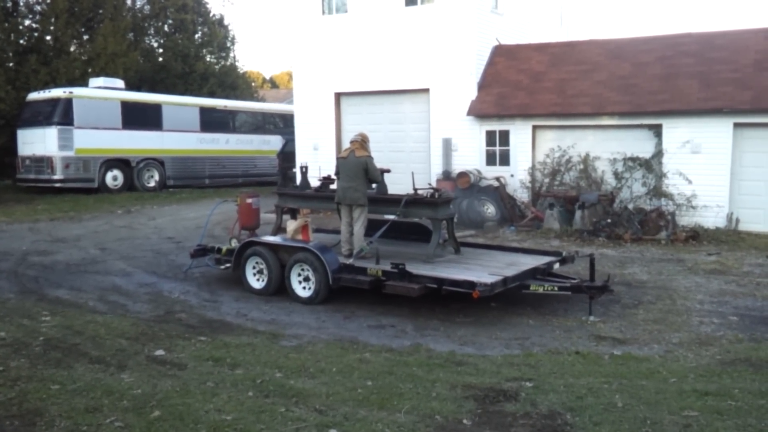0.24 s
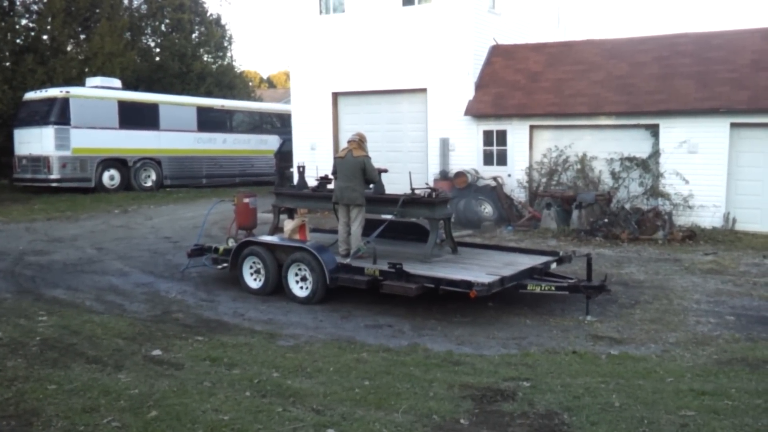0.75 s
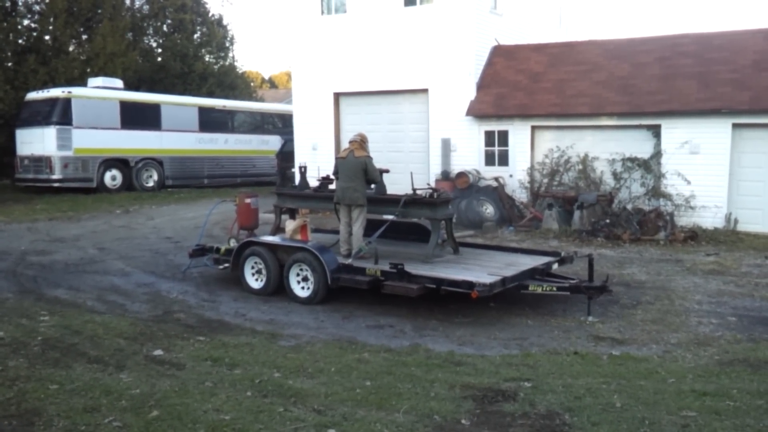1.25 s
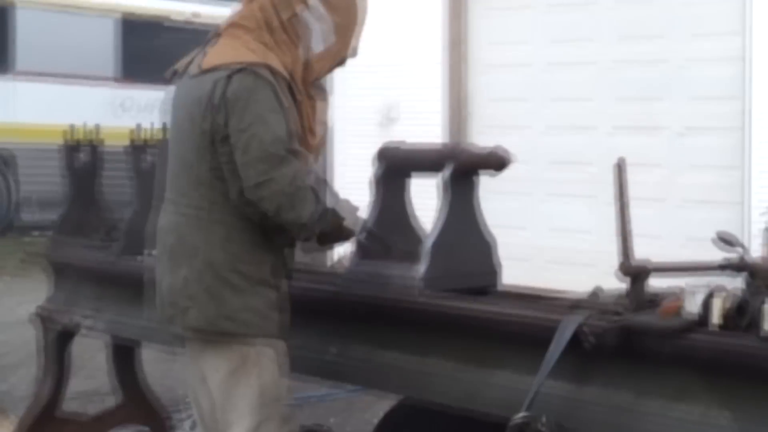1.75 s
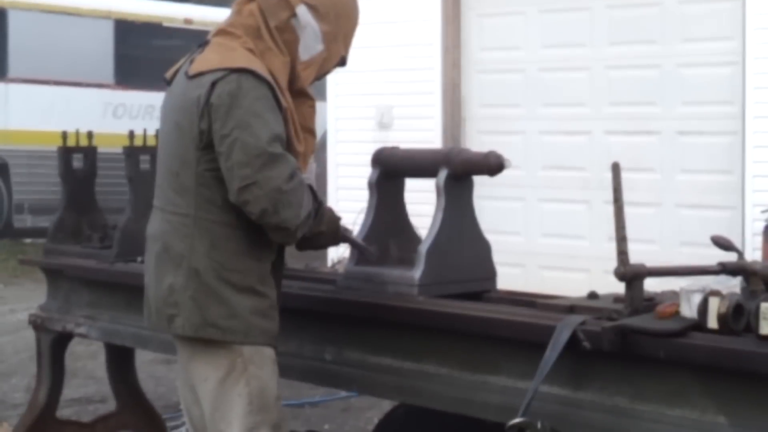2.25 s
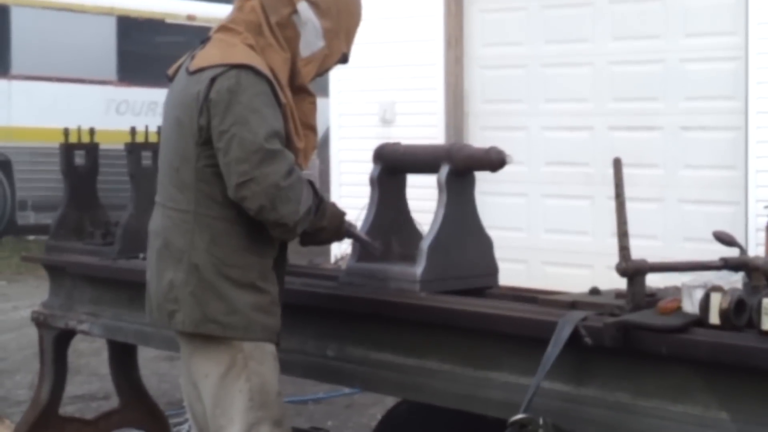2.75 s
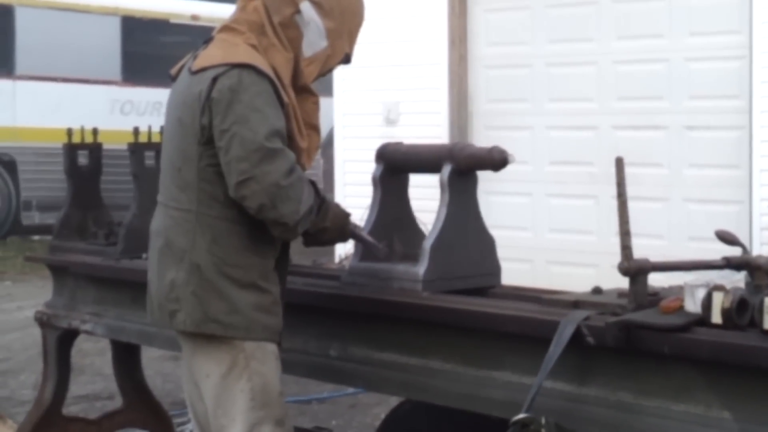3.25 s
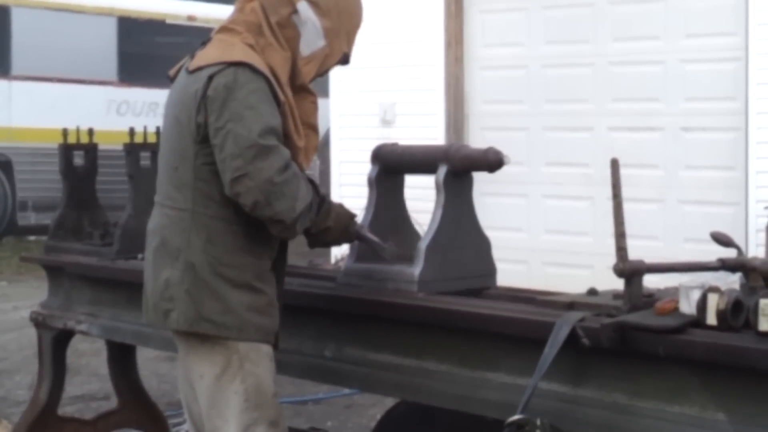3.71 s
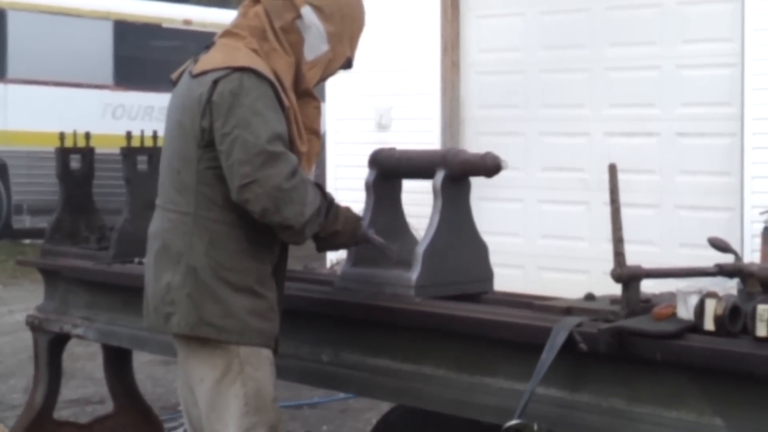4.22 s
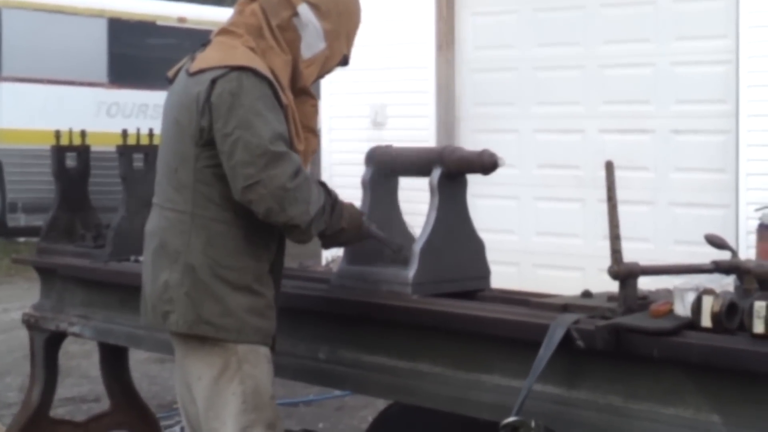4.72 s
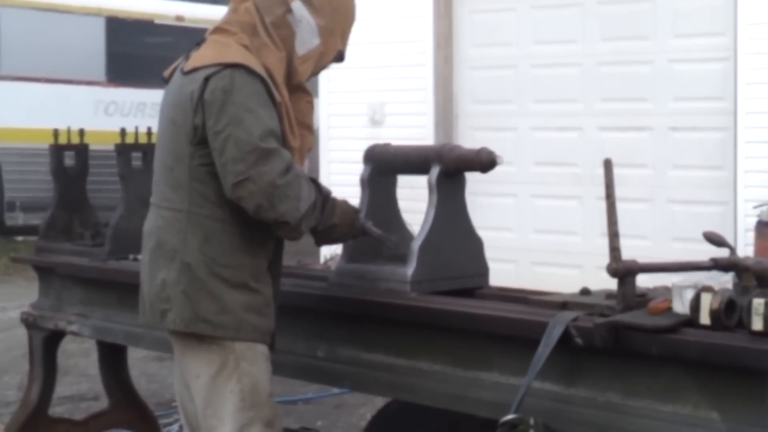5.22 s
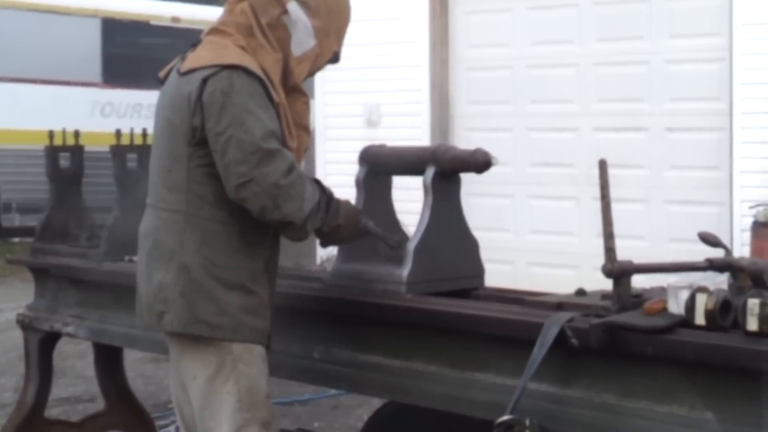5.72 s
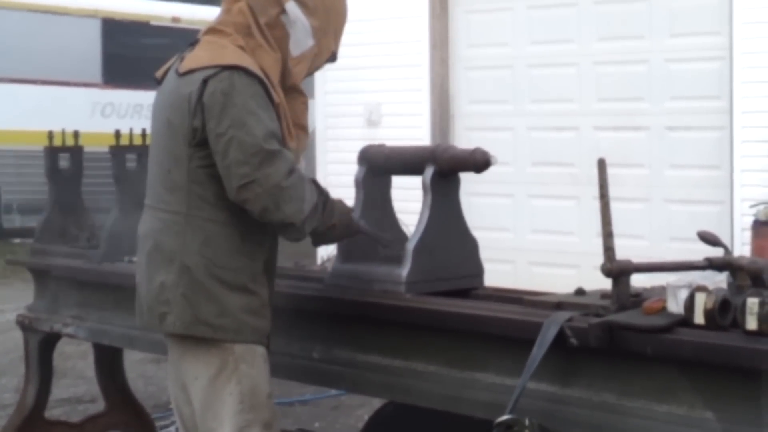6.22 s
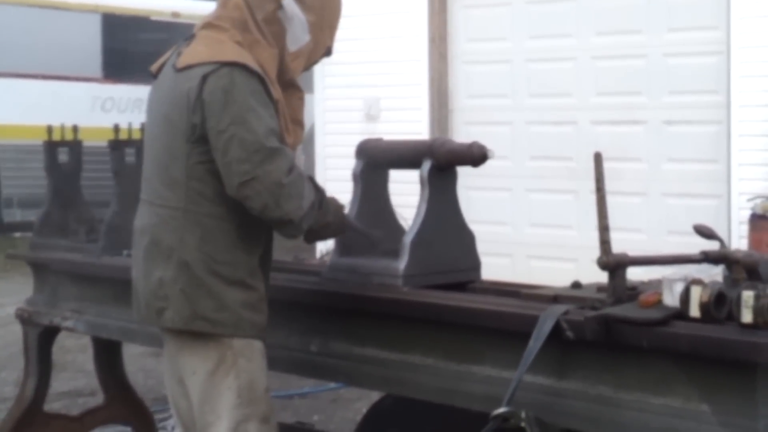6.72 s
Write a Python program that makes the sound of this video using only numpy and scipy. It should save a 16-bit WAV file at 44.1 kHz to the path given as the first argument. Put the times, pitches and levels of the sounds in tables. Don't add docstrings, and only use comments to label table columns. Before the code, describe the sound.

Outdoors, a sandblaster hisses steadily from a distance over a faint compressor hum, then swells into a loud, harsh, distorted close-up roar of grit on iron.

```python
import sys
import numpy as np
from scipy import signal
from scipy.fft import rfft, irfft
from scipy.io import wavfile
from scipy.ndimage import uniform_filter1d

SR = 44100
rng = np.random.default_rng(int(sys.argv[2]) if len(sys.argv) > 2 else 0)


def boost(x):
    u = np.asarray(x, float) / 20
    return 10 ** u


def pcm_store(signal):
    levels = np.round(np.clip(np.atleast_2d(signal), -1, 1) * 32767)
    wavfile.write(sys.argv[1], SR, levels.astype(np.int16).T)


N = 306936
CAMERA_HZ = 16000
CAMERA_N = N * CAMERA_HZ // SR
FAR_N = 2 * SR
HOP = 128
SCENE_CHANGE_S = 1.864
FADE_START_S, FADE_S, FADE_IN_POWER, FADE_OUT_POWER = 1.48, 0.67, 0.62, 0.32
RIB_DEPTH = 0.94
RIB_HZ = 2500
WHISTLE_HALF_WIDTH_HZ, HOLLOW_HALF_WIDTH_HZ = 55, 104

# f/Hz, level per Hz/dB
CLOSE_SPECTRUM = [(18, -52), (30, -23.5), (150, -23.5), (331, -22), (969, -19.5), (1340, -20.5),
                  (1780, -19), (2770, -14), (3180, -17), (3750, -10.5), (4310, -3.5), (4730, -4),
                  (5700, -1), (6870, -5), (7900, -24.5), (10300, -58.5), (17400, -120)]
# t/s, level/dB
CLOSE_DRIVE = [(1.5, 1), (3, 2.5), (4, 2), (5, 1), (6, 1), (6.96, 1)]
# t/s, half length/s, extra path/ms, ripple/dB (minus = turned over)
RIB_ECHOES = [(2.22, 0.4, 0.392, -1.7), (2.22, 0.55, 0.748, -1.2), (2.29, 0.4, 1.12, -1.3),
              (2.36, 0.8, 1.508, 1.3), (2.69, 0.28, 0.184, 1.4), (2.84, 0.55, 0.244, -1.5),
              (3.19, 0.2, 0.62, -2.2), (3.47, 0.4, 1.312, -1.1), (3.8, 0.2, 0.76, 2.3),
              (4.09, 0.8, 1.068, -0.8), (4.17, 0.14, 0.932, 2.2), (4.28, 0.1, 0.236, 2.3),
              (4.85, 0.14, 1.276, -2.5), (5.21, 0.07, 0.532, 2.7), (5.87, 0.2, 1.188, 2.1),
              (5.98, 0.28, 1.628, 1.4), (6.25, 0.4, 0.54, -2.1), (6.37, 0.1, 1.388, 2.2),
              (6.59, 0.2, 0.22, 1.8), (6.71, 0.2, 0.368, 3.0), (6.73, 0.1, 0.876, 2.1),
              (6.83, 0.2, 0.572, -1.7)]
# t/s, f/Hz, level over the hiss/dB
CLOSE_WHISTLE = [(1.9, 5950, -7.5), (2.07, 5870, 7), (2.25, 5800, -2.5), (2.85, 5870, 3), (3, 5540, 5.5),
                 (3.3, 5470, -1), (3.6, 5230, 3), (4.1, 5300, 2.5), (4.16, 4400, 0), (4.42, 4500, 4),
                 (4.55, 5750, 4.5), (5.15, 5700, 2), (5.4, 5270, 4), (5.55, 4940, 5), (6.15, 5020, 3),
                 (6.3, 5050, 0), (6.6, 5550, 6), (6.96, 5850, 4)]
# t/s, half length/s, f/Hz, level/dB
CLOSE_HOLLOWS = [(1.66, 0.17, 6100, -7), (1.69, .08, 5490, 13), (1.797, 0.058, 5530, -10),
                 (3.35, 0.64, 4030, 1), (4.872, 0.088, 4380, 3.5), (4.87, 0.12, 5000, 1.5),
                 (6.33, .07, 5560, 3), (3.201, 0.87, 3680, -1), (2.242, 0.061, 4850, 6.5),
                 (3.7, 0.44, 40, 4.5), (3.83, 0.19, 3900, -5), (3.852, .07, 1250, 8.5),
                 (4.08, .07, 6340, -4), (4.3, 0.3, 2010, 4), (4.35, 0.071, 4500, 5), (4.393, 0.09, 3460, 8),
                 (4.42, 0.35, 1310, 4.5), (4.53, 0.1, 6720, 1), (4.83, .2, 5220, -1),
                 (5.38, 0.17, 3460, 7.5), (5.477, 0.054, 6700, -5), (5.75, 0.065, 750, 5),
                 (5.78, .2, 5000, 0), (5.89, 0.16, 5600, -6), (5.97, .55, 2060, 3), (6.36, .1, 2540, 5),
                 (6.767, 0.091, 2770, 7), (6.91, 0.31, 3540, 5)]
# t/s, f/Hz, peak level/dB, t60/s
STONE = (4.724, 2000, -20, .09)
# f/Hz, level per Hz/dB
FAR_SPECTRUM = [(18, -40), (30, -14), (228, -12), (449, -18), (594, -8.5), (924, -5), (1110, -10.5),
                (1580, -11.5), (1860, -8.5), (2900, -8), (3330, -2.5), (3660, -6), (5310, -2), (6560, -3.5),
                (7900, -30), (10300, -68), (17400, -120)]
# f/Hz, width/Hz, level/dB
FAR_RESONANCES = [(232, 190, -0.5), (630, 150, -2), (960, 180, 2), (1290, 156, -5.5), (1880, 140, 1),
                  (2110, 119, -2), (2500, 97, -4), (2660, 94, -17), (3325, 190, 4), (3830, 80, -12),
                  (3935, 230, 6.5), (4600, 100, -3), (5030, 120, 5.5), (5230, 155, -1.5), (5530, 120, -2),
                  (5700, 88, 0), (6150, 130, -9)]
# t/s, level/dB
FAR_LEVEL = [(0, -21.5), (.42, -21.6), (.52, -23), (.62, -22), (1.06, -22.8), (1.25, -21.5), (1.42, -22.5),
             (2, -21.5)]
# t/s, f/Hz, level over the hiss/dB
FAR_WHISTLE = [
    (1.1, 920, -4.5),
    (1.3, 910, 1.5),
    (1.9, 910, -0.5),
]
# t/s, half length/s, f/Hz, level/dB
FAR_HOLLOWS = [
    (.1, 0.1, 4120, 2.5),
    (.68, 0.14, 2960, 6),
    (1.27, .09, 4820, 4.5),
    (1.3, .09, 5330, 2),
    (1.46, 0.053, 5140, -8),
    (1.5, 0.4, 1300, 5),
    (1.68, 0.089, 4760, 7),
    (1.75, .08, 2740, 7),
]
# f/Hz, level rms/dB
COMPRESSOR = [(58.5, -54), (145, -58), (263.8, -54), (609, -54), (764, -53), (894, -50), (925, -49),
              (953, -53), (1014, -48)]
# t/s, half length/s, f/Hz, level/dB
WIND_BUMPS = [
    (.902, .014, 250, -35),
    (.942, .016, 210, -38),
    (.95, .02, 70, -40),
    (1.468, .005, 120, -34),
    (1.466, .002, 380, -36),
]
# t/s, low f/Hz, high f/Hz
WIDE_NOISE = [(1.908, 7600.0, 8960.0), (3.788, 4650.0, 5710.0), (3.788, 8270.0, 9650.0),
              (4.183, 6290.0, 7600.0), (4.276, 4220.0, 5710.0), (4.648, 5680.0, 8290.0),
              (4.648, 9000.0, 10440.0), (4.648, 10590.0, 11050.0), (4.671, 5170.0, 6310.0),
              (4.694, 6910.0, 8290.0), (4.903, 4220.0, 5710.0), (5.042, 6930.0, 8290.0),
              (5.437, 8960.0, 10360.0), (6.203, 6290.0, 7600.0), (6.296, 9670.0, 11050.0),
              (6.436, 4650.0, 6310.0), (6.436, 6910.0, 10340.0), (6.459, 4220.0, 5190.0),
              (6.459, 8290.0, 9670.0)]


def hiss(n, colour_db, hollows, echoes, whistle, patchy_db, throb_db):
    hz, s, spectrum = signal.stft(rng.standard_normal(n), SR, nperseg=8 * HOP, noverlap=7 * HOP)
    throb = drift(14.0, (1, len(s)))
    patches = np.repeat(drift(6.0, (129, len(s))), 4, axis=0)[:len(hz)]
    gain_db = colour_db(hz)[:, None] + throb_db * throb
    gain_db = gain_db + patchy_db * uniform_filter1d(patches, size=5, axis=0)

    lifts, facing = [], []
    for at, length, centre_hz, db in hollows:
        lifts.append(db * bell(hz, centre_hz, HOLLOW_HALF_WIDTH_HZ))
        facing.append(bell(s, at, length))
    reflected = hz ** 4 / (hz ** 4 + RIB_HZ ** 4)
    for at, length, ms, db in echoes:
        comb = np.cos(2 * np.pi * hz * ms / 1000)
        lifts.append(RIB_DEPTH * db * comb * reflected)
        facing.append(bell(s, at, length))
    gain_db = gain_db + np.transpose(lifts) @ facing

    at, pitch_hz, lift_db = np.transpose(whistle)
    ridge = bell(hz[:, None], np.interp(s, at, pitch_hz), WHISTLE_HALF_WIDTH_HZ)
    gain_db = gain_db + np.interp(s, at, lift_db) * ridge
    x = signal.istft(spectrum * boost(gain_db), SR, nperseg=8 * HOP, noverlap=7 * HOP)[1][:n]
    return x / x.std()


def close_colour(hz):
    return at_hz(CLOSE_SPECTRUM, hz)


def close_blast(t):
    blast = hiss(N, close_colour, CLOSE_HOLLOWS, RIB_ECHOES, CLOSE_WHISTLE, patchy_db=1.17, throb_db=0.73)
    squashed = np.tanh(boost(in_time(CLOSE_DRIVE, t)) * blast)
    guard = signal.butter(6, 6900, fs=SR, output="sos")
    return boost(-12.0) * signal.sosfilt(guard, squashed) + stone_ping(t)


def stone_ping(t):
    at, hz, db, t60 = STONE
    age = np.maximum(t - at, 0)
    return boost(db - 60 * age / t60) * np.sin(2 * np.pi * hz * age)


def far_colour(hz):
    lift = 0
    for f_hz, width_hz, top_db in FAR_RESONANCES:
        lift = lift + boost(top_db) / (1 + (2 * (hz - f_hz) / width_hz) ** 2)
    return at_hz(FAR_SPECTRUM, hz) - 4 + 20 * np.log10(1 + lift)


def far_position(t):
    jet = hiss(len(t), far_colour, FAR_HOLLOWS, [], FAR_WHISTLE, patchy_db=-0.1, throb_db=0.44)
    blast = boost(in_time(FAR_LEVEL, t)) * (1 - fade(t)) ** FADE_OUT_POWER * walls(jet, echo_db=-19.0)
    gate = np.clip((SCENE_CHANGE_S - t) / 0.015, 0, 1)
    return np.pad((blast + compressor(t) + wind(t)) * gate, (0, N - len(t)))


def walls(x, echo_db):
    out = x.copy()
    for lag in (rng.uniform(.008, .06, 12) * SR).astype(int):
        out[lag:] += boost(echo_db) * x[:-lag]
    return out / out.std()


def compressor(t):
    wander = np.repeat(drift(1.95, (2 * len(COMPRESSOR), len(t) // HOP + 1)), HOP, axis=1)[:, :len(t)]
    pitch = 1 + .003 * wander[::2]
    swell_db = 2.5 * wander[1::2] - 3 * np.clip((t - 1.6) / .26, 0, 1)
    out = np.zeros(len(t))
    for (hz, db), p, swell in zip(COMPRESSOR, pitch, swell_db):
        phase = 2 * np.pi * np.cumsum(hz * p) / SR
        out += np.sqrt(2) * boost(db + swell) * np.sin(phase)
    return out


def wind(t):
    out = np.zeros(len(t))
    for at, length, hz, db in WIND_BUMPS:
        shape = bell(t, at, length)
        band = signal.butter(2, [hz * 0.5, hz * 1.35], "band", fs=SR, output="sos")
        puff = shape * signal.sosfilt(band, rng.standard_normal(len(t)))
        out += boost(db) * puff * np.sqrt(np.sum(shape ** 2) / np.sum(puff ** 2))
    return out


def camera(x, top):
    return np.clip(signal.resample(x, CAMERA_N), -top, top)


def full_rate(x):
    images, hz = np.resize(np.fft.fft(x), N // 2 + 1), np.fft.rfftfreq(N, 1 / SR)
    smoothing = 1 / (1 + boost((hz - 8000) * .011))
    top_cut = 1 / np.sqrt(1 + (hz / 10400) ** 34) / (1 + (hz / 11150) ** 90)
    return irfft(images * smoothing * top_cut, N) * N / CAMERA_N


def fade(t):
    return np.clip((t - FADE_START_S) / FADE_S, 0, 1)


def bell(x, centre, half_width):
    return np.exp(-.5 * ((x - centre) / half_width) ** 2)


def drift(rate_hz, shape):
    r = np.exp(-2 * np.pi * rate_hz * HOP / SR)
    noise = rng.standard_normal((shape[0], shape[1] + 300))
    slow = signal.lfilter([1], [1, -2 * r, r * r], noise)[:, 300:]
    return slow / slow.std()


def at_hz(points, hz):
    f, db = np.transpose(points)
    return np.interp(np.log(hz + 1), np.log(f), db)


def in_time(rows, s):
    return np.interp(s, *np.transpose(rows))


def scene():
    t, t_camera = np.arange(N) / SR, np.arange(CAMERA_N) / CAMERA_HZ
    far = camera(far_position(t[:FAR_N]), top=.9)
    close = camera(close_blast(t), top=.25)
    return np.tile(full_rate(far + fade(t_camera) ** FADE_IN_POWER * close), (2, 1))


def low_pass(x):
    return signal.sosfilt(signal.butter(12, 11330, fs=SR, output="sos"), x)


def record(dry):
    out, hz = dry.copy(), np.fft.rfftfreq(2048, 1 / SR)
    window = signal.windows.kaiser_bessel_derived(2048, 4 * np.pi)
    for at, low_hz, high_hz in WIDE_NOISE:
        middle = round(at * SR)
        frame = slice(middle - 1024, middle + 1024)
        band = (hz > low_hz) & (hz < high_hz)
        true = rfft(dry[:, frame]) * band
        level = uniform_filter1d(np.abs(true), size=31) * band
        noise = level * rfft(rng.standard_normal((2, 2048))) / 36
        out[:, frame] += window * irfft(noise) - window ** 2 * irfft(true)
    return low_pass(out)


dry = scene()
out = record(dry)
pcm_store(out)
```